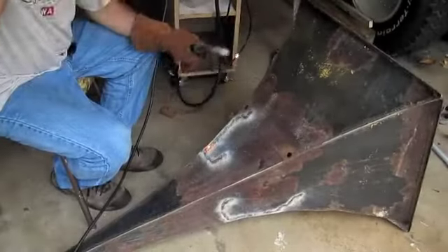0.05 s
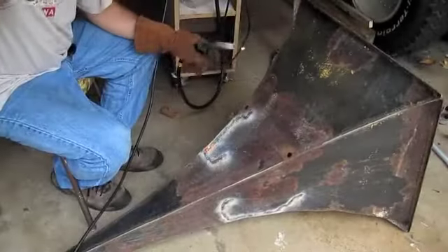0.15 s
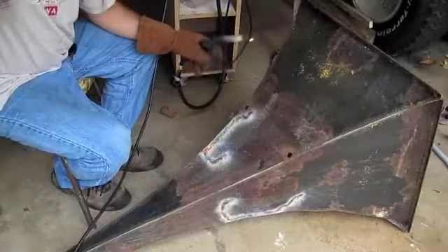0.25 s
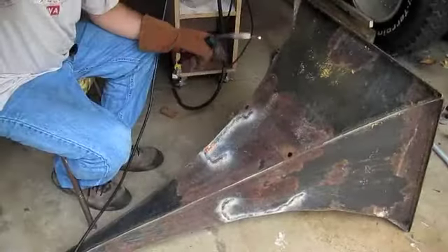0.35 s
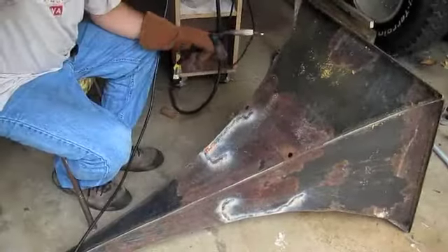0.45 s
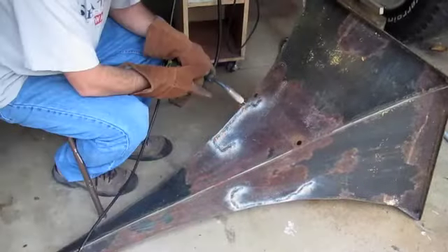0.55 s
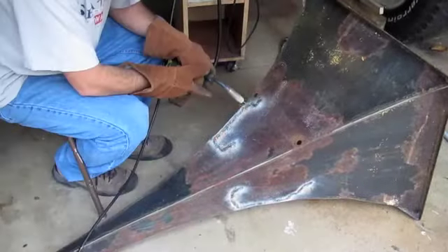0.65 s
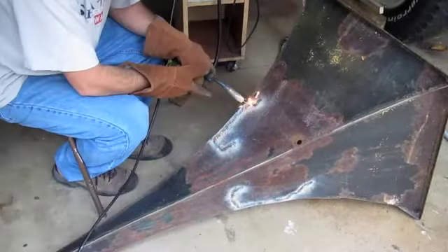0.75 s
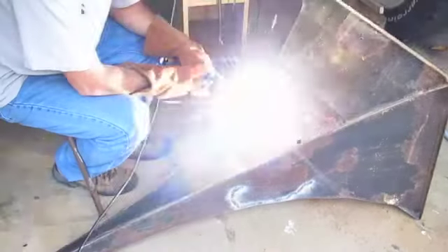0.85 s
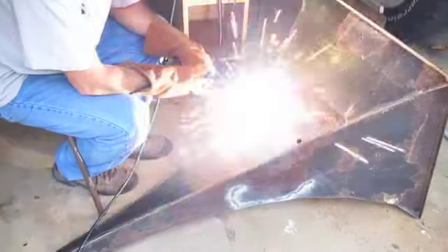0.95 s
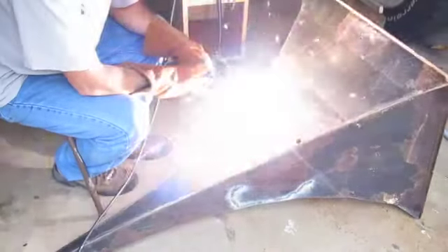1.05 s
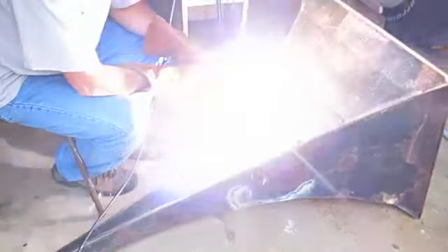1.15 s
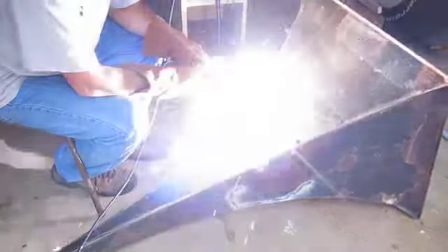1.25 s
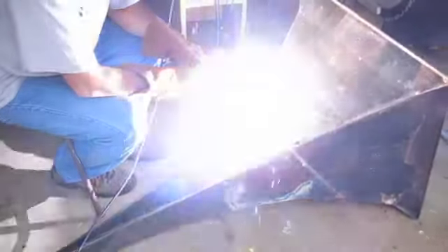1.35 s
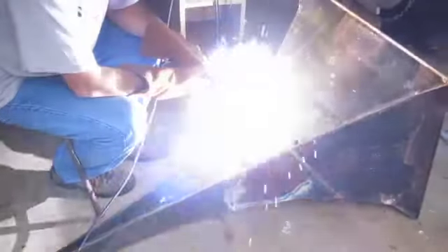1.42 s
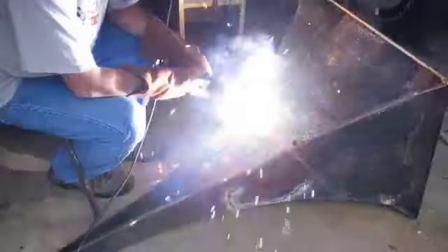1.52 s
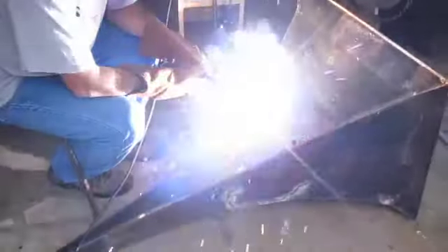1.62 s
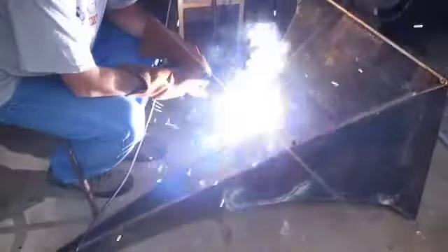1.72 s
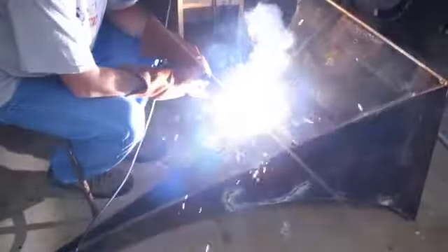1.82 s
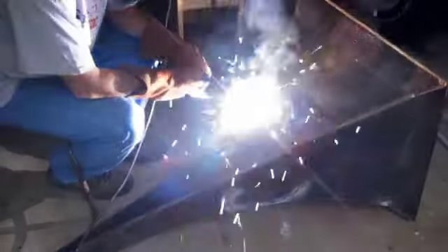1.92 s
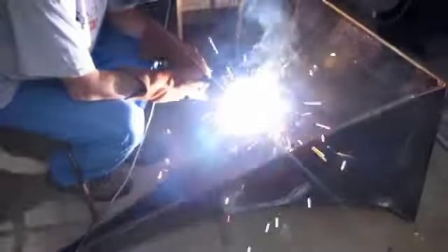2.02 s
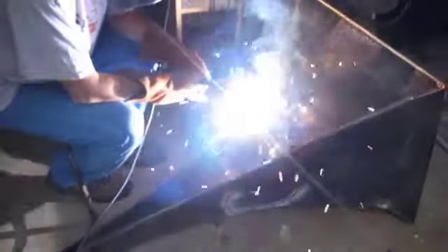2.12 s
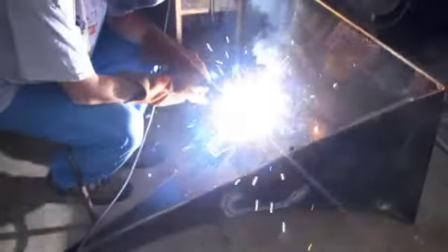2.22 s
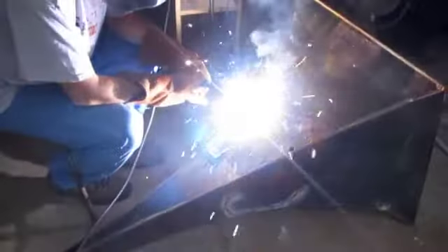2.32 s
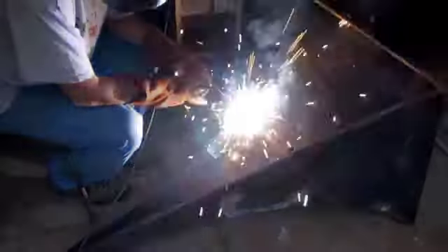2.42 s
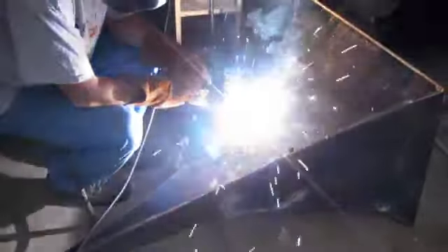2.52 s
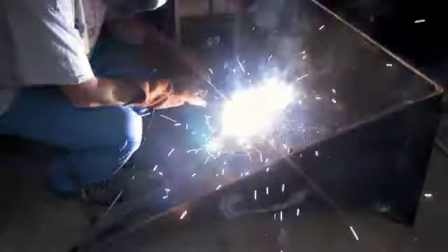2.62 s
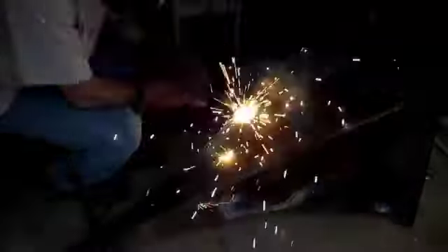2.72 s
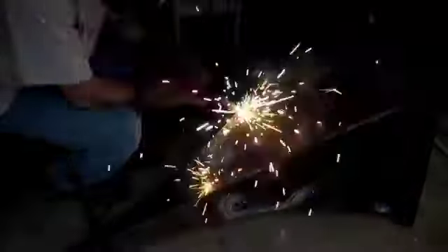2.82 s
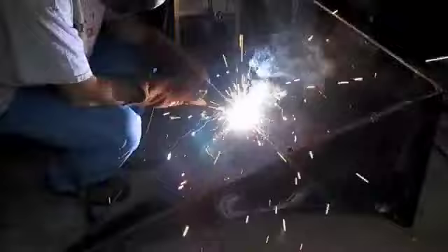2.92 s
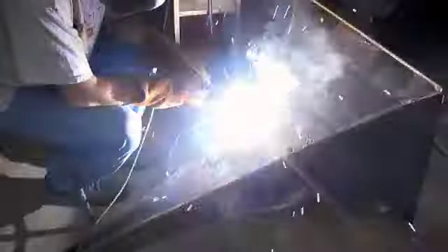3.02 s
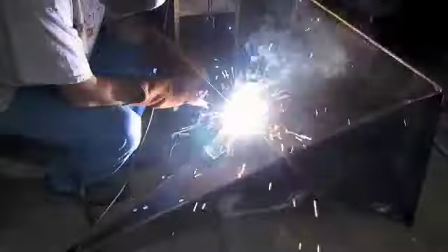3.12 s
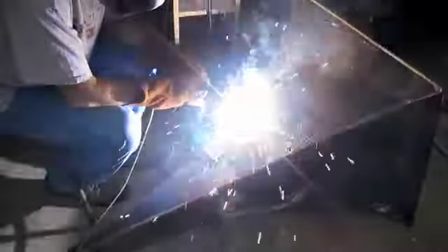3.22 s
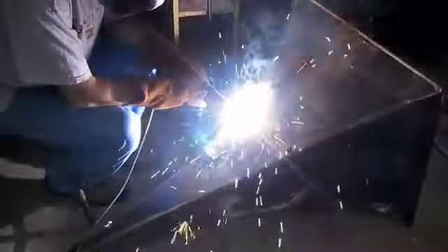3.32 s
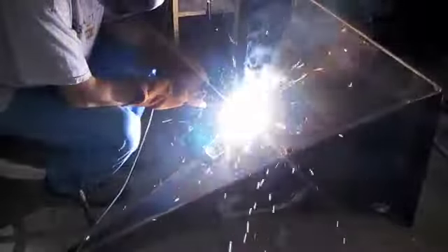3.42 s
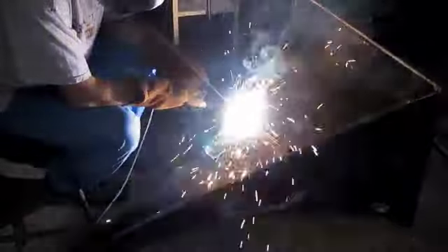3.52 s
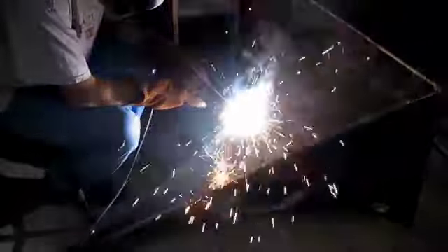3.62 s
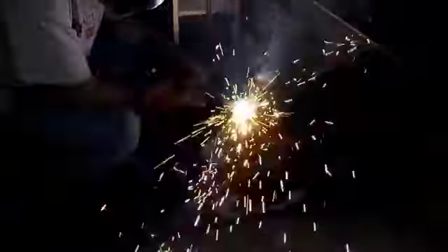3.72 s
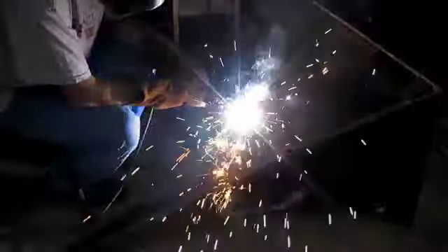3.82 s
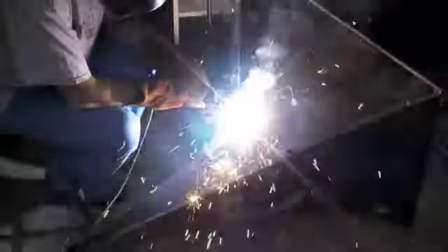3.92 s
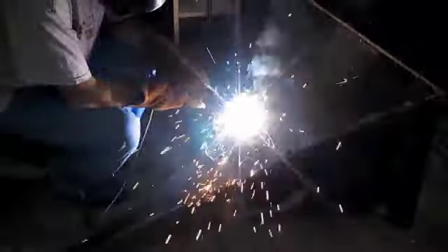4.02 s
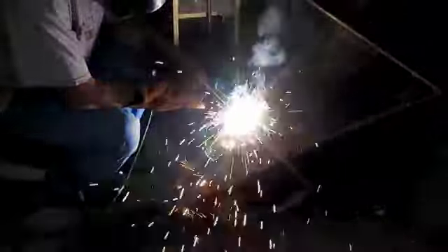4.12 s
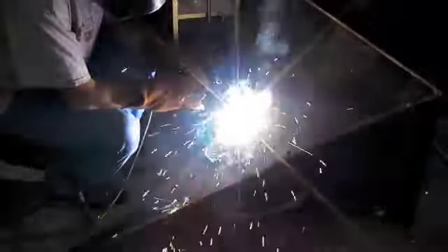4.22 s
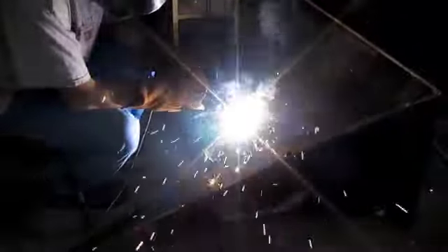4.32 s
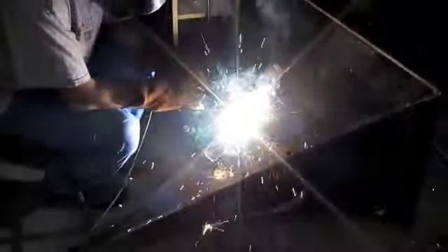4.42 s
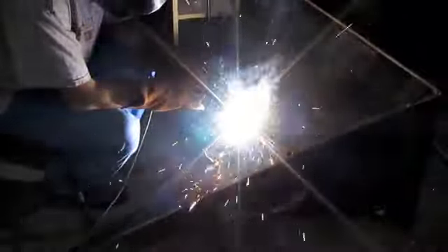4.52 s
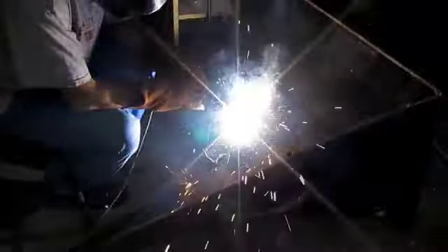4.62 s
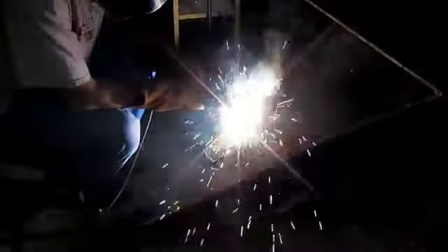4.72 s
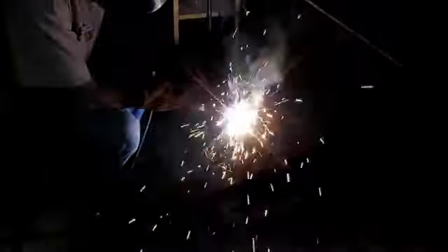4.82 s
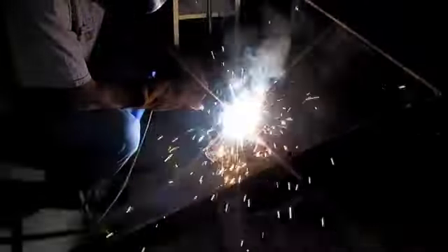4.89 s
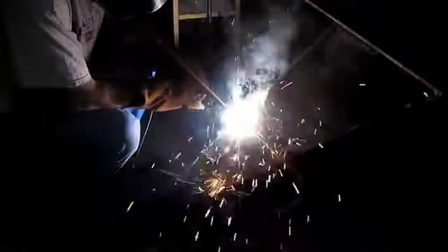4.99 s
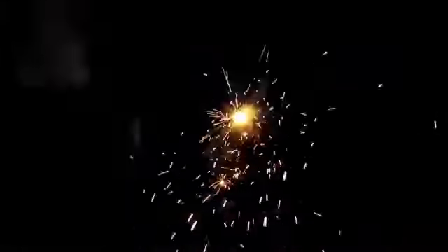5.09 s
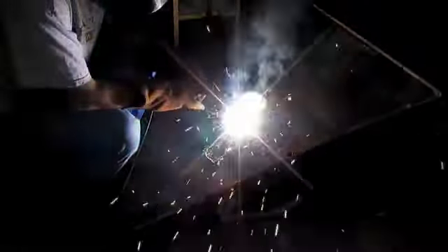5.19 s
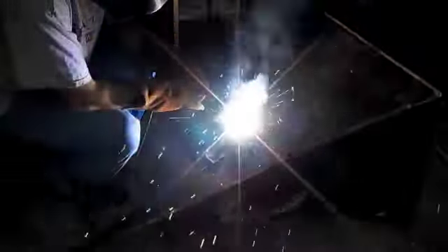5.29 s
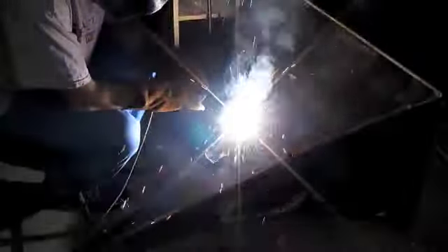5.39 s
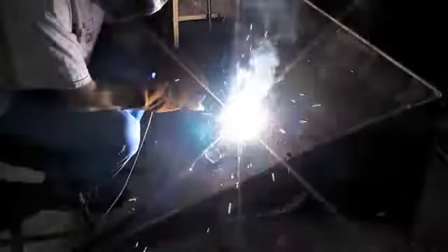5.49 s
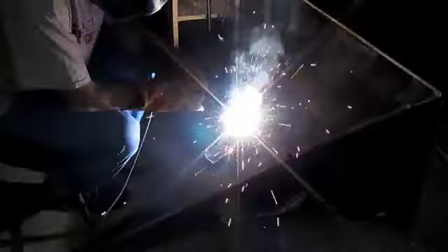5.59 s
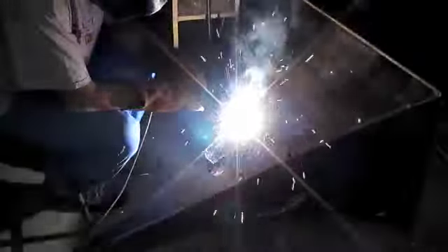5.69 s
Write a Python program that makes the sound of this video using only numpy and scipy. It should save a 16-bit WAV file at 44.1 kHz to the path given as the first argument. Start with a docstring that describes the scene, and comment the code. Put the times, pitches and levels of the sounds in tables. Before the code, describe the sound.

For the first 0.8 seconds only a quiet cooling fan is heard, a mid-low whirring tone with airy rush that almost vanishes momentarily around 0.55. At 0.81 shielding gas opens with a slight surge into a faint, bright hiss. At 0.87 the arc strikes suddenly, with a cluster of very loud cracks until about 1.0. From then on a dense, dry, frying crackle runs to the end at about 5.7, pulsing roughly 120 times a second, with irregular sharp snaps, bright or dull, several each second. It chokes briefly near 1.4, 1.6, 2.65, 2.9 and 5.1, relighting abruptly; strong cracks stand out near 2.84 and 4.85. Low, soft gas thumps accompany some bursts, notably at 1.42, 2.3 and 2.9. The thin steel rings briefly, a faint low transformer hum sits underneath, and the fan fades beneath the crackle. Close stereo microphones in a garage hear short echoes and a diffuse tail.

```python
"""A wire-feed welder lays a bead on sheet steel in a garage, heard at two microphone ports: sharp snaps as the
arc relights, over a dense sizzle of random spark pulses that follows the rectified mains, with flares and stalls.
Bursts of metal push out low puffs of gas; the sheet rings in its modes and the room smears the crackle.
The cooling fan (blade harmonics in shaped noise) runs first, then shielding gas (shaped noise) opens; the
transformer hums as two sines while the arc burns."""
import sys
import numpy as np
from scipy import signal
from scipy.fft import rfft, irfft
from scipy.io import wavfile
from scipy.ndimage import uniform_filter1d

SR = 44100
rng = np.random.default_rng(int(sys.argv[2]) if len(sys.argv) > 2 else 0)


def digitize_waveform(pressure):
    """Quantize a signal to 16-bit integers and store it at the path in sys.argv[1].

    Rows of a 2-D input are taken as channels; values are limited to [-1, 1].
    """
    field = np.atleast_2d(pressure).T
    bounded = np.clip(field, -1, 1)
    quanta = np.round(bounded * 32767).astype(np.int16)
    wavfile.write(sys.argv[1], SR, quanta)


N = 253575
TIME = np.arange(N) / SR
BINS_HZ = np.fft.rfftfreq(N, 1 / SR)
RIPPLE_HZ = 120  # rate of the rectified mains
EDGE_HZ = 15900  # upper band limit


def gain_of(db):
    """Logarithmic level: decibels to amplitude ratio."""
    return 10 ** (np.asarray(db) / 20)


def evened(x):
    """Normalization of power: scales to rms 1."""
    return x / np.sqrt(np.mean(x ** 2) + 1e-20)


def read(points, hz):
    """Logarithmic pitch scale: interpolates a spectrum along log frequency."""
    f, value = np.transpose(points)
    return np.interp(np.log(hz + 1), np.log(f), value)


def level(rows):
    """Amplitude envelope: a level curve, linear in decibels, as a gain at every sample."""
    return gain_of(np.interp(TIME, *np.transpose(rows)))


def drift(hz):
    """Band-limited random fluctuation: low-passed noise of rms 1."""
    return evened(irfft(rfft(rng.standard_normal(N)) / (1 + (BINS_HZ / hz) ** 4), N))


def below(x, hz):
    """Zero-phase low-pass filtering: the part of a sound under the given frequency."""
    return irfft(rfft(x) / (1 + (BINS_HZ / hz) ** 8), N)


def convolve(x, response):
    """Linear superposition: convolves along time and keeps the scene's length."""
    return signal.fftconvolve(np.atleast_2d(x), np.atleast_2d(response), axes=1)[:, :N]


# likeness of diffuse sound at the two ports: (frequency [Hz], correlation [0-1])
PORT_LIKENESS = [(100, 0.2), (400, 0.85), (900, .78), (2500, 0.95), (4500, 0.79), (6500, 0.32), (10000, 0),
                 (15000, 0.3)]


def at_ports(pair):
    """Spatial coherence: mixes two unrelated signals until they are as alike as a diffuse field at the ports."""
    size = pair.shape[1]
    a, b = rfft(pair)
    same = np.clip(read(PORT_LIKENESS, np.fft.rfftfreq(size, 1 / SR)), 0, 1)
    mid = a * np.sqrt((1 + same) / 2)
    side = b * np.sqrt((1 - same) / 2)
    return irfft(np.array([mid + side, mid - side]), size)


def air_noise(spectrum):
    """Broadband turbulence noise: white noise shaped by a spectrum, diffuse at the ports."""
    white = rfft(rng.standard_normal((2, N)))
    return evened(at_ports(irfft(white * gain_of(read(spectrum, BINS_HZ)), N)))


# course of the fan's level: (time [s], level [dB])
FAN_LEVEL = [(0, -48), (.44, -44), (.85, -44.5), (5.75, -61)]
# harmonics of the blades: (multiple of the blade rate, relative level [dB])
BLADE_TONES = [(1, -14.5), (2, -6.5), (3, -5.5), (4, -15), (5, -13), (6, -13.5), (7, -15.5), (8, -21),
               (9, -17), (10, -25)]
# spectrum of the fan's rushing air: (frequency [Hz], relative level [dB])
FAN_SPECTRUM = [(30, -35), (110, -13), (250, -3), (370, 7.5), (450, -5), (850, -0.5), (1500, -7.5),
                (2700, -7.5), (4000, -18), (5400, -18), (6700, -26.5), (9500, -23), (14000, -36),
                (16000, -48)]


def fan(air_db=-5.0, tone_db=-2, blade_hz=273.3, dip_s=.551, dip_half_s=0.1, dip_db=-37, dip_curve=1.04):
    """Blade-passing harmonics, wavering in pitch and level, in turbulence noise; the level dips once, briefly."""
    angle = 2 * np.pi * np.cumsum(blade_hz * (1 + .005 * drift(15))) / SR
    tones = np.zeros(N)
    for multiple, db in BLADE_TONES:
        waver = gain_of(db + 3 * drift(14))
        tones += waver * np.sin(multiple * angle + .85 * drift(20))
    dip = np.minimum(gain_of(dip_db) + (abs(TIME - dip_s) / dip_half_s) ** dip_curve, 1)
    return level(FAN_LEVEL) * dip * (gain_of(air_db) * air_noise(FAN_SPECTRUM) + gain_of(tone_db) * tones)


# spectrum of the shielding gas: (frequency [Hz], relative level [dB])
GAS_SPECTRUM = [(200, -52), (1000, -4.5), (2500, -4), (4000, -9.5), (5200, -6.5), (6700, -11.5), (9500, -5),
                (16000, -21)]


def gas(start_s=.812, gas_db=-40, surge_db=5, surge_s=0.035):
    """Jet noise: the valve opens with a small decaying surge and gas hisses from the nozzle."""
    since = np.maximum(TIME - start_s, 0)
    opening = np.minimum(since / .001, 1)
    return opening * gain_of(gas_db + surge_db * np.exp(-since / surge_s)) * air_noise(GAS_SPECTRUM)


def bubble(t, bright_db, ring_hz=2150, ring_s=0.0013, size=0.094, dull_db=-13):
    """Damped resonance: bubbles bursting in the molten pool ring for a few cycles, most in the dullest snaps."""
    share = size / (1 + gain_of(bright_db - dull_db) ** 2)
    return share * np.cos(2 * np.pi * ring_hz * t) * np.exp(-t / ring_s)


# loudest snaps of the relighting arc: (time [s], strength [dB], brightness, treble against body [dB])
ARC_SNAPS = [(0.8698, 8, 4), (0.8751, 13.5, 1.5), (0.9021, 4.5, -13), (0.936, 12.5, -6), (0.9539, 13, 2),
             (1.0131, 7.5, -14), (1.1172, -3, -6), (1.1573, 7.5, -2), (1.1992, 3.5, -5),
             (1.2442, 9.5, -0.5), (1.2993, 6.5, -5), (1.3247, 8, -2), (1.349, 3, -4), (1.3669, 7, -3),
             (1.423, 13.5, 0.5), (1.4891, 8, -8), (1.5026, 10, -7), (1.5518, 9, -7), (1.6171, 3.5, 3.5),
             (1.6268, 8.5, 3.5), (1.7152, 10, 1), (1.7865, 5.5, -8), (1.8292, 5.5, -9), (1.8725, 0.5, -16),
             (1.8836, 3, 9), (1.9363, 4.5, -2), (1.9404, 3, 7), (1.9955, 5.5, -13), (2.012, 4.5, 4.5),
             (2.0827, 8.5, -10), (2.1625, 8.5, 0), (2.1914, 8, 3), (2.2497, 7, -5), (2.3, 6, -9),
             (2.3398, 5, -7), (2.4567, 9.5, 3), (2.6067, 7.5, 0), (2.6458, 4.5, -5), (2.7173, 9, 3),
             (2.7515, 6.5, 0), (2.767, 3.5, -1), (2.8439, 15, 2), (2.8528, 9, 4), (2.8943, 10.5, 0),
             (2.9543, 1, 0), (2.969, 3.5, -12), (3.0522, 2.5, -5), (3.0597, 4, -15), (3.0957, 9, 6),
             (3.117, 7.5, 2.5), (3.1685, 6, 4), (3.1752, 9.5, -3), (3.2647, 9, 6), (3.268, 10, 2),
             (3.3072, 6.5, 2), (3.4663, 0.5, 1), (3.5662, 11, 0.5), (3.6766, 7.5, 0), (3.712, 6.5, -7),
             (3.759, 1.5, 1), (3.8513, 11, 3.5), (3.893, 5, 0), (3.9962, 5, -7), (4.015, 7.5, -35),
             (4.0674, -1.5, -3), (4.1335, 7.5, 7), (4.151, 1, 3), (4.1843, 7, -4), (4.2196, 1.5, -9),
             (4.2259, 7, -8), (4.284, 5.5, -1), (4.3006, 10, 2), (4.3204, 8.5, 3), (4.4428, 8.5, 1.5),
             (4.5121, 6.5, -11), (4.5338, 4, -12), (4.5846, 4.5, -8), (4.7333, 11.5, 5), (4.7766, -1.5, 8),
             (4.8014, 0, 4), (4.849, 13.5, 8), (4.9509, 7, -14), (4.9929, 1.5, -12), (5.02, 11.5, 2),
             (5.0326, 3.5, 1), (5.1596, -1, -2), (5.1825, -4, -2), (5.208, 3, -5), (5.2153, 7, -20),
             (5.2771, 8, 2.5), (5.3302, 5, -8), (5.4641, 5.5, -4.5), (5.535, 0.5, -2), (5.5754, 10.5, 5),
             (5.652, 4, 7), (5.7169, 8.5, 0)]
FIRST_STRIKE_S = ARC_SNAPS[0][0]


def snaps(snap_db=0, split_hz=6500, treble_db=1, spit=.22, spit_s=0.0008, after=0.55, after_s=.003):
    """Impulsive excitation: each relighting is a shock, an after-crack and a brief decaying spit of droplets."""
    body, treble = np.zeros((2, N + SR))
    t = np.arange(400) / SR
    grits = np.diff(rng.standard_normal((len(ARC_SNAPS), len(t) + 1)))  # the spit is mostly treble
    lags = rng.uniform(.15, 1, len(ARC_SNAPS)) * after_s
    for (s, db, bright_db), grit, lag in zip(ARC_SNAPS, grits, lags):
        after_crack = after * (abs(t - lag) < .5 / SR)
        droplets = spit * grit * np.exp(-t / spit_s) * (t > 0)
        shock = (t == 0) + after_crack + droplets
        strength = gain_of(db + snap_db) / np.hypot(1, gain_of(bright_db))
        at = round(s * SR)
        body[at:at + len(t)] += strength * (shock + bubble(t, bright_db))
        treble[at:at + len(t)] += strength * gain_of(bright_db + treble_db) * shock / np.linalg.norm(shock)
    return below(body[:N], split_hz) + treble[:N] - below(treble[:N], split_hz)


def sparks(per_s, spread_db, ripple_db, clump_db):
    """Random point process: small sparks of random size, in clumps, modulated by the rectified mains."""
    ripple = np.cos(2 * np.pi * (RIPPLE_HZ * TIME - .3))
    db = spread_db * rng.uniform(-1.6, 1, N) + ripple_db * ripple + clump_db * np.tanh(drift(81))
    train = gain_of(db) * (rng.random(N) < per_s / SR)
    return evened(train - uniform_filter1d(train, size=200))


def sputter(crest=.27, split_hz=5000, size_db=8, colour_db=4, alternate_db=2):
    """Periodic triggering with jitter: lesser snaps cluster near each crest of the rectified mains.
    They tend to be strong and weak by turns, each with its own size and colour."""
    cycles = np.arange(int(N / SR * RIPPLE_HZ) - 1)
    late, size, colour = rng.uniform(-1, 1, (len(cycles), 3)).T
    at = (abs(cycles + crest + .45 * late ** 3) / RIPPLE_HZ * SR).astype(int)  # the cube keeps most near the crest
    db = size_db * size + alternate_db * (-1.) ** cycles
    body, treble = np.zeros((2, N))
    body[at] = gain_of(db - colour_db * colour)
    treble[at] = gain_of(db + colour_db * colour)
    return evened(below(body, split_hz) + treble - below(treble, split_hz))


# the wire sticks in the pool and the arc dies down: (start [s], relight [s], deepest change [dB])
ARC_STALLS = [(1.047, 1.117, -17), (1.383, 1.424, -16), (1.567, 1.618, -16), (1.876, 1.94, -12),
              (1.946, 1.995, -6.5), (2.016, 2.068, -10.5), (2.645, 2.704, -22), (2.888, 2.962, -23),
              (3.017, 3.051, -17), (3.114, 3.174, -18), (3.81, 3.851, -6), (5.064, 5.187, -15.5),
              (5.236, 5.325, -8.5)]


def stalling(fall_db_per_s=502):
    """Exponential decay, in dB: the arc dies down at a steady rate to its floor and relights at once."""
    change_db = np.zeros(N)
    for start, relight, depth_db in ARC_STALLS:
        change_db += np.clip(-fall_db_per_s * (TIME - start), -abs(depth_db), 0) * (TIME < relight)
    return change_db


# the arc flares and throws a run of spatter: (start [s], length [s], change in level [dB])
ARC_FLARES = [(0.876, 0.15, 7), (1.237, 0.018, 5), (1.339, 0.052, 9.5), (1.82, .025, -0.5),
              (2.177, 0.066, 1.5), (2.499, 0.04, 6), (2.649, 0.013, 9.5), (2.835, 0.017, 0),
              (3.04, 0.0134, 2), (3.171, 0.106, 7), (3.691, 0.032, 5.5), (4.19, 0.087, 3),
              (5.187, 0.045, 3), (5.433, 0.036, 5.5)]


def flaring(rise_s=0.0041, fall_s=0.005):
    """Trapezoidal envelope, in dB: each flare's change in level sets in quickly, holds and ends."""
    change_db = np.zeros(N)
    for start, length, boost_db in ARC_FLARES:
        rise = (TIME - start) / rise_s
        fall = 1 - (TIME - start - length) / fall_s
        change_db += boost_db * np.clip(np.minimum(rise, fall), 0, 1)
    return change_db


# how hard the arc burns along the bead: (time [s], relative level [dB])
BURN_LEVEL = [(.87, -32.5), (1.15, -29.5), (1.5, -30), (1.68, -32), (1.8, -26), (2.2, -25), (2.4, -28.5),
              (2.9, -26), (3.4, -31), (3.55, -32), (3.95, -25), (4.1, -30), (4.5, -26), (4.85, -24),
              (5.05, -27.5), (5.35, -28), (5.75, -25)]


def arc_activity():
    """Amplitude modulation: the burn of the arc from the first strike on, with its flares and stalls."""
    return level(BURN_LEVEL) * gain_of(flaring() + stalling()) * (TIME > FIRST_STRIKE_S)


def sizzle(sizzle_db=-10, pop_db=-10, pop_hz=4500, fizz_db=-9, fizz_hz=6500, sputter_db=1,
           low_hz=130, bass_cut=0.93, arc_db=-1.5):
    """Superposed random impulses: the arc sputters and fries, the pool pops dully, the finest sparks fizz."""
    frying = sparks(per_s=450, spread_db=8, ripple_db=4, clump_db=3)
    pops = below(sparks(per_s=400, spread_db=3, ripple_db=-0.5, clump_db=15), pop_hz)
    fine = sparks(per_s=3100, spread_db=-2.5, ripple_db=-0.5, clump_db=9)
    fizz = fine - below(fine, fizz_hz)
    bed = evened(gain_of(sizzle_db) * frying + gain_of(pop_db) * pops + gain_of(fizz_db) * fizz)
    mix = bed + gain_of(sputter_db) * sputter()
    thinned = mix - bass_cut * below(mix, low_hz)  # small sparks lack bass
    return gain_of(arc_db) * arc_activity() * thinned


# spectrum of one spark: (frequency [Hz], relative level [dB])
SPARK_SPECTRUM = [(40, -50), (170, -28.5), (400, -13), (1000, -6.5), (1500, -5), (2200, -1), (2800, -3.5),
                  (3300, -6), (4300, -7.5), (5200, -3), (8000, -3.5), (9800, -3), (12000, -7.5),
                  (15500, -23)]
# a hollow in the crackle's treble: (centre [Hz], width [Hz], depth [dB])
TREBLE_HOLLOW = (6670, 700, -10)


def spark_pulse(size=2048):
    """Minimum-phase pulse of one spark, of energy 1; all-pass filters then delay two broad bands."""
    hz = abs(np.fft.fftfreq(size, 1 / SR))
    centre, width, depth_db = TREBLE_HOLLOW
    db = read(SPARK_SPECTRUM, hz) + depth_db * np.exp(-((hz - centre) / width) ** 2)
    db = db - np.clip((hz - EDGE_HZ) / 30, 0, 60)
    log_spectrum = np.conj(signal.hilbert(np.log(gain_of(db))))  # the phase that makes it causal
    pulse = np.fft.ifft(np.exp(log_spectrum)).real
    for centre_hz, q in [(1500, .8), (9000, 1)]:
        poles = signal.iirpeak(centre_hz, q, fs=SR)[1]
        pulse = signal.lfilter(poles[::-1], poles, pulse)  # delays a band without changing its level
    return pulse / np.linalg.norm(pulse)


# modes of the steel sheet: (frequency [Hz], relative level [dB])
SHEET_MODES = [(245, -2), (330, -8), (402, 4), (520, -2), (700, -7), (835, -5), (1053, -2), (1083, -2),
               (1553, -3), (1719, -1), (1918, -1), (2027, 0), (2185, -1), (2325, -1), (2525, -2),
               (2720, -2), (2838, -1), (3074, -4), (3331, -6), (3807, -3), (4899, -4), (9630, -6)]


def sheet_ring(t60_s=.11, ring_db=-58):
    """Modal decay: the direct pulse, then the dying modes of the steel."""
    t = np.arange(SR // 2) / SR
    ring = sum(gain_of(db) * np.cos(2 * np.pi * hz * t) for hz, db in SHEET_MODES)
    return (t == 0) + gain_of(ring_db) * ring * gain_of(-60 * t / t60_s)


# bursts of molten metal that push out hot gas: (time [s], relative level [dB])
GAS_PUFFS = [(0.87, -45), (0.951, -43), (1.158, -45), (1.245, -41), (1.367, -43), (1.424, -35),
             (1.503, -46), (1.553, -46), (1.715, -45), (2.012, -42), (2.163, -46), (2.299, -35),
             (2.457, -42), (2.717, -44), (2.768, -45), (2.895, -31), (2.971, -45), (3.265, -39),
             (3.852, -44), (4.32, -42), (4.444, -45), (4.513, -41), (4.636, -43), (4.736, -46), (5.02, -37),
             (5.465, -46)]


def puffs(puff_db=2, swell_s=0.00096, gush_db=4, gush_s=0.0054, gush_hz=330):
    """Monopole radiation: expanding gas gives a low push and a slower pull, with a short turbulent gush."""
    train = np.zeros(N)
    for s, db in GAS_PUFFS:
        train[round(s * SR)] += gain_of(db)
    t = np.arange(2000) / SR
    u = t / swell_s
    push = (1 - u) * np.exp(-u) * (1 - np.exp(-5 * u))
    turbulence = evened(below(np.diff(rng.standard_normal(N + 1)), gush_hz))
    gush = convolve(train, np.exp(-t / gush_s) * (1 - np.exp(-u)))[0] * turbulence
    return gain_of(puff_db) * convolve(train, push / push.max())[0] + gain_of(gush_db) * gush


# reverberation of the garage: (frequency [Hz], decay by 60 dB [s])
GARAGE_T60 = [(150, 0.8), (600, 0.26), (2500, 0.33), (8000, 0.21), (15000, 0.28)]


def diffuse_tail(build_s=0.00057):
    """Statistical reverberation: a noise tail builds up quickly and each band decays at its own rate."""
    size = SR // 2
    hz, t, z = signal.stft(rng.standard_normal((2, size)), SR, nperseg=256)
    z = z * gain_of(-60 * t / read(GARAGE_T60, hz)[:, None]) * (1 - np.exp(-t / build_s))
    tail = at_ports(signal.istft(z, SR, nperseg=256)[1][:, :size])
    return tail / np.linalg.norm(tail[0])


# echoes off the sheet, the floor and the welder: (delay [s], gain [ratio])
NEAR_ECHOES = [(.00105, 0.17), (.0019, -0.01), (.0029, 0.14), (.0037, 0.03), (.0063, .17), (.0082, -0.13),
               (0.0159, 0.095)]


def garage(x, shift_hz=3, count=4, tail_db=-4):
    """Early reflections and a reverberant field that keeps changing as the arc moves about."""
    near = np.zeros((2, SR // 20))
    near[:, 0] = 1  # direct sound
    for (delay, gain), skew in zip(NEAR_ECHOES, rng.integers(-1, 2, len(NEAR_ECHOES))):
        near[0, round(delay * SR)] += gain
        near[1, round(delay * SR) + skew] += gain  # a sideways echo reaches the ports at unlike times
    shares = np.array([drift(shift_hz) for _ in range(count)])
    shares /= np.linalg.norm(shares, axis=0)
    tails = sum(convolve(x * share, diffuse_tail()) for share in shares)
    return convolve(x, near) + gain_of(tail_db) * tails


# hum of the welding current: (time [s], level [dB])
HUM_LEVEL = [(.87, -69), (1.2, -62), (3.1, -65), (3.4, -62), (4.1, -63), (4.3, -58), (4.85, -57.5),
             (5.1, -63), (5.75, -61)]


def hum(second_db=-64):
    """Magnetostriction: a hum at twice the mains rate, with a wavering octave, sagging in each stall."""
    angle = 2 * np.pi * RIPPLE_HZ * TIME
    octave = gain_of(second_db + 2 * drift(7.5)) * np.sin(2 * angle)
    tone = level(HUM_LEVEL) * np.sin(angle) + octave
    onset = np.clip((TIME - FIRST_STRIKE_S) / 0.018, 0, 1)
    return onset * gain_of(stalling()) * tone


def scene():
    """Source and path: the arc on its sheet in the garage, with the machine beside it."""
    arc = convolve(convolve(snaps() + sizzle(), spark_pulse()), sheet_ring())
    return garage(arc + puffs()) + hum() + fan() + gas()


# left port against right: (frequency [Hz], level difference [dB])
PORT_BALANCE = [(70, -3), (300, -0.5), (3500, 0.5), (6600, -3), (9000, -0.8), (15000, 1.5)]


def record(dry, ceiling=.95):
    """Transducer response: ports unlike in colour, saturation that rounds loud snaps, then a band limit."""
    tilt_db = read(PORT_BALANCE, BINS_HZ) / 2
    ported = irfft(rfft(dry) * gain_of([tilt_db, -tilt_db]), N)
    rounded = ceiling * np.tanh(ported / ceiling)
    edge = signal.firwin(255, EDGE_HZ, window=("kaiser", 8), fs=SR)
    return signal.oaconvolve(rounded, edge[None], "same")


dry = scene()
out = record(dry)
digitize_waveform(out)
```